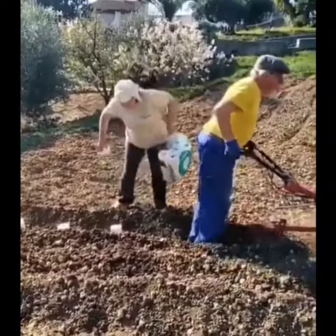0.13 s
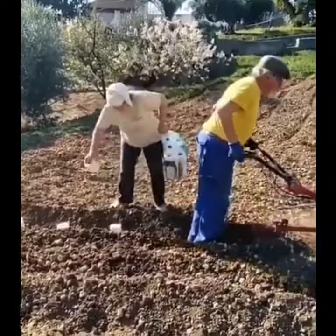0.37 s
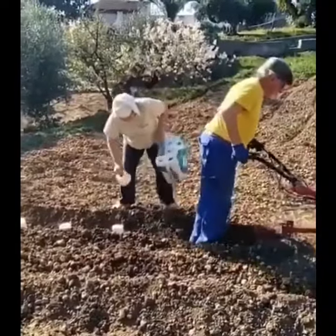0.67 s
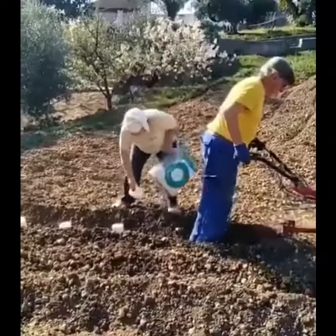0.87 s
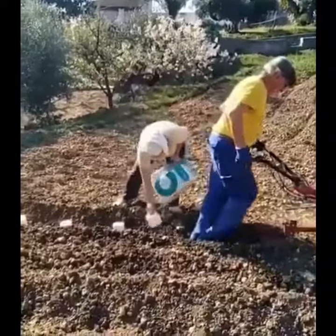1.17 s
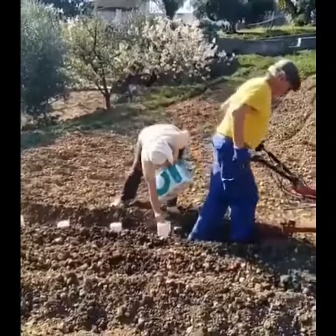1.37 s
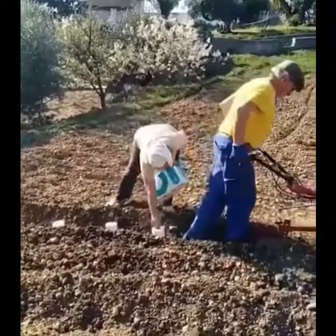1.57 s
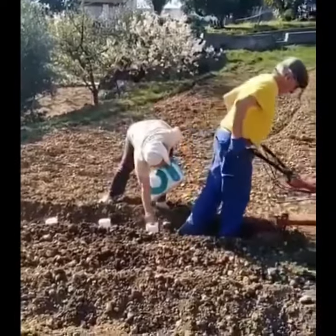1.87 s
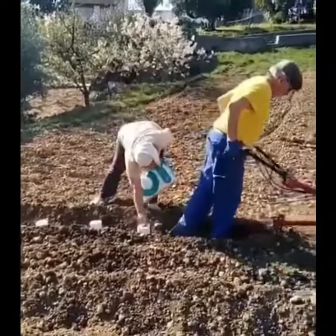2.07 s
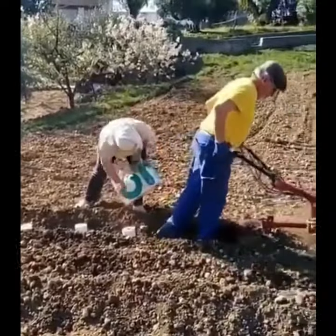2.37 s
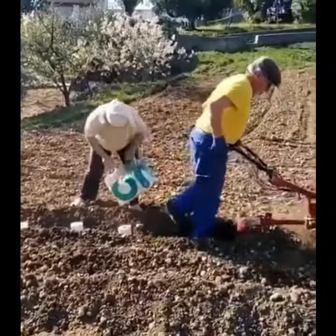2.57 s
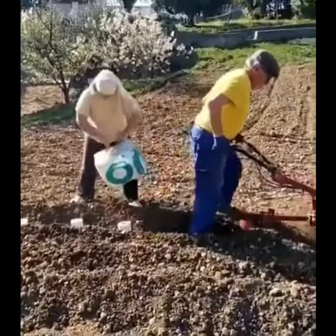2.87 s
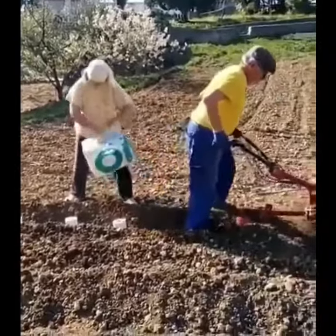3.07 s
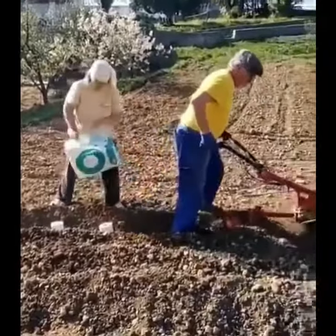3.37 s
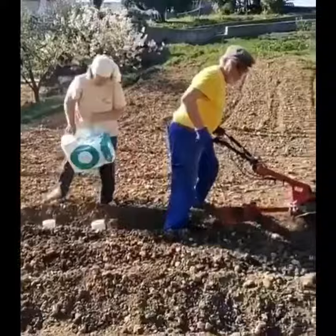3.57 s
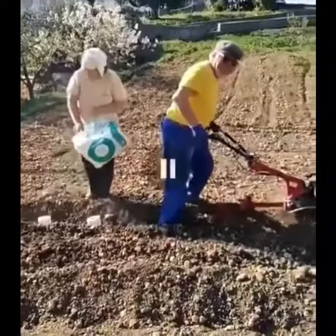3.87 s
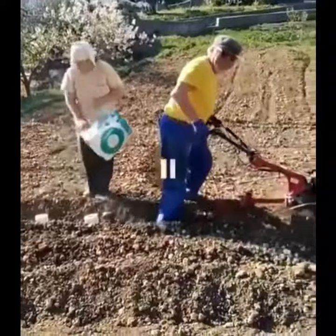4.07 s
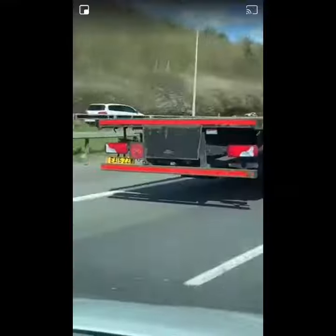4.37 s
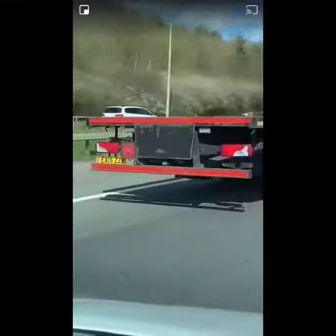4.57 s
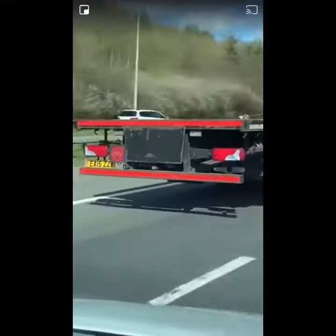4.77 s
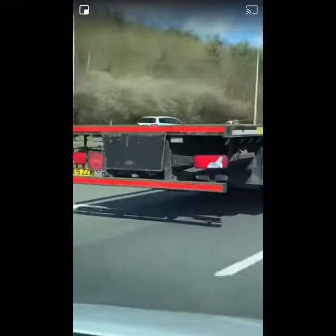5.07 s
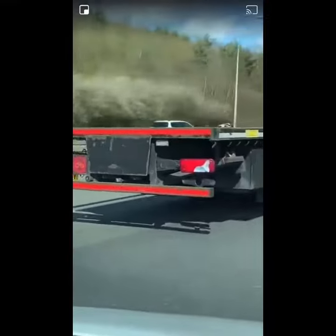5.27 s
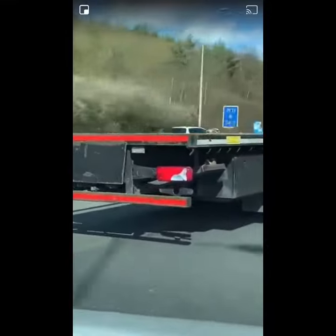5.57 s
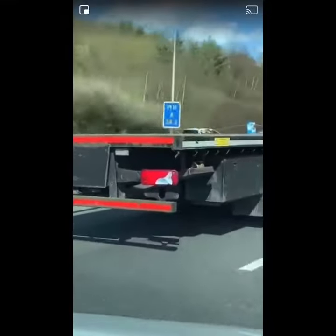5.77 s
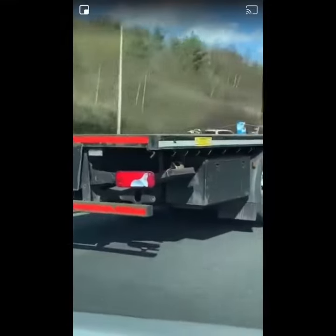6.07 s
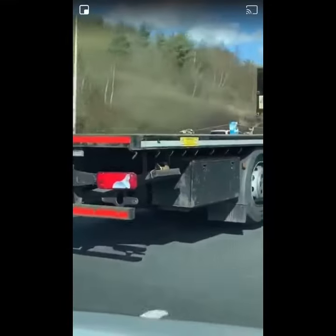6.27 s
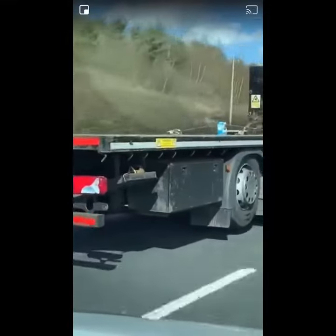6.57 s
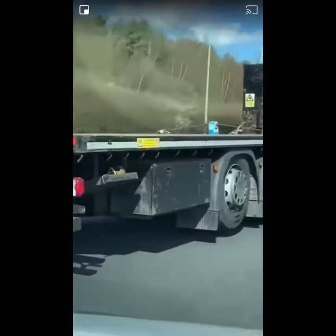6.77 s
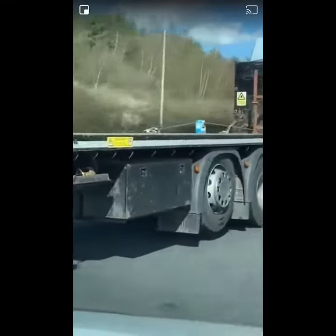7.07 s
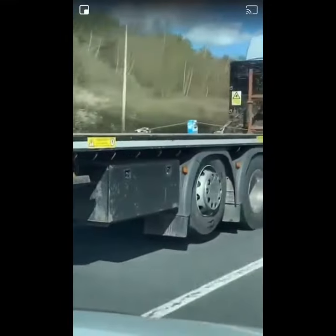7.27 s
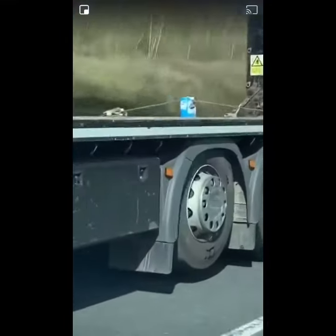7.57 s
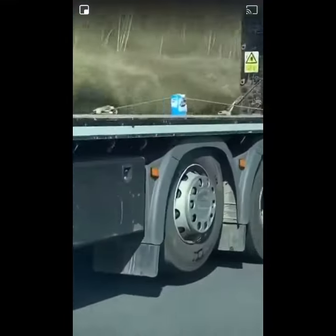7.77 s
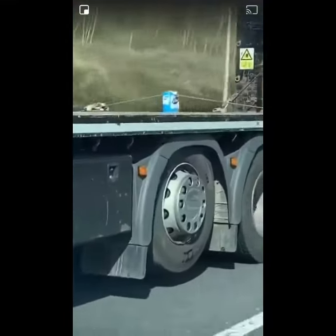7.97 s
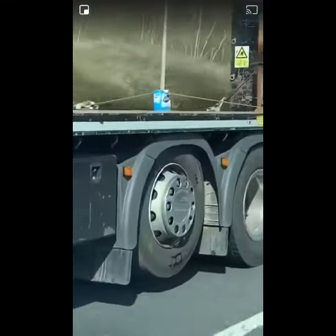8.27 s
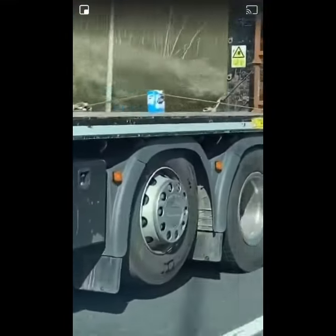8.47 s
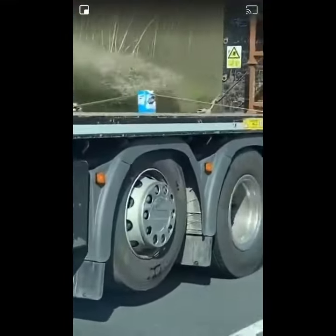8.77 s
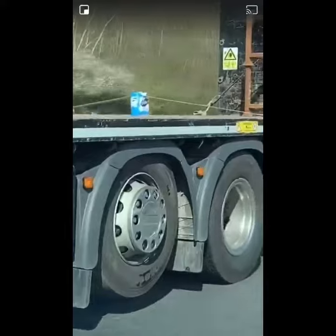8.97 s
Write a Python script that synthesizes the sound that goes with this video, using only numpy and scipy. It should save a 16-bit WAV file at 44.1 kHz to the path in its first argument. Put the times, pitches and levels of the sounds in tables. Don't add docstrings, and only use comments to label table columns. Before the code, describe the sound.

A small petrol tiller chugs and rattles through gravelly soil outdoors, stops dead, then a deep booming car cabin rumble at motorway speed takes over.

```python
import sys
import numpy as np
from scipy import signal
from scipy.fft import rfft, irfft, dct, next_fast_len
from scipy.io import wavfile
from scipy.ndimage import uniform_filter1d, map_coordinates

SR = 44100
rng = np.random.default_rng(int(sys.argv[2]) if len(sys.argv) > 2 else 0)


def invert_db(x):
    u = np.asarray(x, float) / 20
    return 10 ** u


def bounce(signal):
    frames = np.transpose(np.atleast_2d(signal))
    limited = np.clip(frames, -1, 1)
    pcm = np.round(limited * 32767).astype(np.int16)
    wavfile.write(sys.argv[1], SR, pcm)


N = 402633

# [t/s, firing rate/Hz]
FIRING_RATE = [(0.0, 32.07), (0.244, 33.61), (0.577, 32.09), (0.706, 33.47), (0.839, 32.87), (1.4, 33.17),
               (1.477, 34.46), (1.529, 32.83), (2.066, 33.04), (2.33, 34.23), (2.544, 31.71),
               (2.691, 34.08), (2.986, 32.26), (3.303, 32.78), (3.406, 34.01), (3.568, 31.82),
               (3.672, 33.19), (4.3, 32.73)]
# [t/s, level/dB]
TINE_LOAD = [
    (0, 0.5),
    (.4, 0),
    (1.0, 0),
    (2.0, 0.5),
    (2.45, 0),
    (3.15, 0.5),
    (3.5, -0.5),
    (3.9, 1),
    (4.3, 0),
]
# [multiple of firing rate, level/dB]
EXHAUST_ORDERS = [(1, -23.5), (2, -4.5), (3, -1), (4, -12.5), (5, -2), (6, 1.5), (7, -4), (8, -4), (9, -4),
                  (10, 3), (11, -3.5), (12, -12.5), (13, -29), (14, -29.5), (15, -20.5), (16, -23.5),
                  (17, -16.5), (18, -26.5), (19, -43.5), (20, -10), (21, -36)]
# [f/Hz, level/dB]
CASING_SPECTRUM = [(400, -42.5), (700, -18.5), (1600, -1.5), (2800, -3), (4000, -9.5), (5300, -6.5),
                   (6400, 3), (7400, 0.5), (9000, -9), (10300, -9), (10900, -46.5)]
# [f/Hz, level/dB]
VALVE_SPECTRUM = [(1200, -20), (2500, -1.5), (8000, -4.5), (10500, -21)]
# [f/Hz, level/dB]
ANSWER_SPECTRUM = [(500, -22), (800, 5), (2000, -2.5), (3500, -35)]
# [f/Hz, level/dB per Hz]
CHURN_SPECTRUM = [(240, -8), (400, -6), (491, -14), (572, -8.5), (665, -1.5), (937, -5), (1580, -2),
                  (2220, -5), (2770, -3), (3960, -14.5), (5280, -7.5), (6320, -2.5), (7240, -2.5),
                  (9800, -8), (10600, -51), (13800, -54), (22000, -120)]
# [t/s, peak level/dB, f/Hz]
STONES = [
    (3.157, -6, 1110),
    (3.179, -6, 991),
]
# [t/s, peak level/dB]
HIGH_FLICKERS = [(0.0488, -30), (0.155, -44), (0.1755, -42), (0.2912, -41.5), (0.5033, -49.5), (0.5663, -43.5),
                 (0.7387, -47.5), (0.7771, -24.5), (0.9902, -30), (1.0819, -37.5), (1.204, -39),
                 (1.2331, -43.5), (1.6546, -51), (1.6857, -44.5), (1.8362, -27.5), (2.0473, -42.5),
                 (2.592, -49), (2.6236, -41), (2.7978, -47), (3.1075, -40.5), (3.1592, -47), (3.2291, -35.5),
                 (3.2899, -29), (3.715, -41), (3.8862, -40.5), (3.926, -45), (3.9599, -41.5), (3.9873, -29.5),
                 (4.141, -41.5), (4.2964, -35)]
# [f/Hz, level/dB]
FLICKER_SPECTRUM = [(11600, -28), (12800, -6), (14000, 0), (15500, -4), (15900, -30)]
# [f/Hz, level/dB]
SKIRT_SPECTRUM = [(10000, 0), (10600, -8), (11600, -26)]
# [t/s, peak level/dB, half length/s]
WIND_GUSTS = [
    (.1, -29.5, .1),
    (.67, -27, 0.071),
    (.86, -22, 0.083),
    (1.2, -22.5, 0.072),
    (1.5, -20, .07),
    (1.93, -24.5, 0.073),
    (3.15, -31.5, 0.11),
    (3.7, -32.5, 0.078),
]
# [f/Hz, level/dB per Hz]
WIND_SPECTRUM = [(30, -33), (60, -7), (150, 2), (300, -5.5), (450, -17), (700, -35)]
# [f/Hz, width/Hz]
DRIFTING_NULLS = [(3600, 200), (4100, 330), (8800, 150), (9200, 200)]
# [t/s, firing order f/Hz, effort level/dB]
CAR_ENGINE = [(4.46, 85.5, -24.5), (4.62, 85.5, -16.5), (5.0, 85.5, -23), (5.1, 85.5, -18.5),
              (5.22, 85.5, -24.5), (5.45, 85.5, -17.5), (6.3, 85.5, -21.5), (6.45, 85.4, -27),
              (6.65, 85.4, -19.5), (7.11, 85.4, -21), (7.4, 84.1, -21.5), (7.75, 84.2, -22.5),
              (7.95, 82.8, -20.5), (8.25, 80.1, -27.5), (8.5, 82.8, -17.5), (8.62, 82.8, -30),
              (8.75, 83, -25), (9.13, 80.1, -23.5)]
# [f/Hz, width/Hz, level/dB]
AIR_MODE = [(50.3, 36, 0)]
# [t/s, boom level/dB, half length/s]
ROAD_BUMPS = [(4.51, -22, .05), (4.88, -17.5, 0.056), (5.05, -17.5, .06), (5.32, -16, .05),
              (5.44, -15, .04), (5.66, -13.5, .05), (5.98, -17.5, .04), (6.09, -18, 0.048),
              (6.38, -17.5, .04), (6.5, -17.5, 0.049), (6.7, -20, 0.1), (6.97, -17.5, .06),
              (7.14, -18.5, 0.078), (7.28, -17, .03), (7.56, -19.5, .07), (7.78, -17.5, .05),
              (7.97, -18.5, 0.16), (8.2, -18, .04), (8.33, -18, 0.033), (8.51, -22, .06),
              (8.75, -14, 0.071), (8.98, -19, 0.033)]
# [f/Hz, width/Hz, level/dB]
PANEL_MODES = [(110.8, 22, 0), (165, 26.4, 0), (196.7, 54.5, -7.5), (261, 26, -6.5), (294, 30.5, -4),
               (347.3, 17, -5.5), (375, 33, -9)]
# [f/Hz, level/dB per Hz]
ROAR_SPECTRUM = [(250, -24), (420, -2.5), (591, -6.5), (820, -5), (1240, -10.5), (1340, -15.5),
                 (1470, -13.5), (3830, -38.5), (4290, -39.5), (4810, -74), (5390, -53.5), (6760, -50),
                 (8600, -62.5), (11200, -84.5), (18900, -120)]
# [f/Hz, level/dB per Hz]
PORT_DIFFERENCE = [(88, -31), (150, -9.5), (213, -1), (262, -1), (341, 1.5), (527, -5), (787, -3.5),
                   (1200, -6.5), (1420, -7.5), (2090, -22.5), (5090, -32), (5950, -39), (6610, -68.5),
                   (8580, -38), (9700, -47.5), (12600, -83), (21300, -120)]
# [t/s, peak level/dB]
RELAY_TICKS = [
    (4.4902, -45),
    (4.8898, -39),
    (4.9916, -47.5),
    (5.2859, -46),
    (5.6885, -40.5),
]
# [f/Hz, width/Hz, level/dB]
RELAY_MODES = [(4130, 200, -5), (5900, 470, -6.5), (6840, 370, -9), (7820, 250, -9)]
# [t/s, peak level/dB]
TRIM_CLICKS = [
    (7.424, -45),
    (7.6804, -56),
    (7.691, -47),
]
# [f/Hz, level/dB]
TRIM_SPECTRUM = [(1500, -8), (3000, -2), (7000, -3), (10000, -13), (11000, -60)]
# [f/Hz, level/dB]
COMMON_TREBLE = [(20, -1), (4100, 1.5), (4400, -13.5), (5000, -2.5), (5400, 10), (8000, 8), (8500, -8.5),
                 (9800, -32)]
# [f/Hz, level/dB]
PORT_LEAN = [(60, -1.3), (300, -2.5), (600, -2.5), (1500, 0)]
# [f/Hz, phase/rad]
PORT_LEAD = [(250, 0), (800, .4), (1500, .5), (3500, .6), (4500, 0)]

FIRST_CYCLE = .37
ECHO_CYCLES, ECHO_GAIN = .335, .6
EXHAUST_DB, CHURN_DB, CLATTER_DB = -23, -18.2, -19.5
EXHAUST_GROWS, CHURN_GROWS = 0.23, 0.87
SHUDDER_DB = 0.23
BREEZE_DB = -33.5
FIELD_TOP_HZ, SKIRT_DB = 10200, -62
CEILING = .72
SMOOTH_ROAD_DB = -26
ROAD_DB, ROAR_MEAN_DB = -18.5, -37.5
ROAD_SWAY_DB, HUM_SWAY_DB = 1, 0.5
ROAR_COMMON_DB, ROAR_APART_DB = 7.5, 7
CUT_S, FADE_START_S, FADE_END_S = 4.2988, 4.392, 4.485


def unit(x):
    return x / np.sqrt(np.mean(x ** 2) + 1e-20)


def shape(points):
    f, db = np.transpose(points)
    return lambda hz: invert_db(np.interp(np.log(hz + 1), np.log(f + 1), db, -120, -120))


def modes(rows):
    def response(f):
        total = 0
        for k, (centre, width, db) in enumerate(rows):
            damping = 1j * f * width
            total = total + (-1) ** k * invert_db(db) * damping / (centre * centre - f * f + damping)
        return total
    return response


def curves(rows):
    s, *cols = np.transpose(rows)
    t = np.arange(N) / SR
    return [uniform_filter1d(np.interp(t, s, c), size=1500) for c in cols]


def wobble(rate_hz):
    knots = rng.standard_normal(int(N * rate_hz / SR) + 4)
    return map_coordinates(knots, [np.arange(N) * rate_hz / SR])


def swells(events, floor_db):
    t = np.arange(0, N, 64) / SR
    power = invert_db(2 * floor_db)
    for s, db, half_s in events:
        power = power + invert_db(2 * db) * np.exp(-((t - s) / half_s) ** 2)
    return np.interp(np.arange(N) / SR, t, 10 * np.log10(power))


def puffs(events, life_s, rise_s):
    env, t = np.zeros(N + SR), np.arange(SR // 4) / SR
    for s, db in events:
        env[round(s * SR):][:len(t)] += invert_db(db - 60 * t / life_s) * (1 - np.exp(-t / rise_s))
    return env[:N]


def filtered(x, response):
    m = next_fast_len(N + 8192)
    return irfft(rfft(x, m) * response(np.fft.rfftfreq(m, 1 / SR)), m)[..., :N]


def rush(response, patchy_db, size=512):
    z = signal.stft(rng.standard_normal(N), nperseg=size)[2]
    field = uniform_filter1d(rng.standard_normal(z.shape), size=3, axis=0)
    field = uniform_filter1d(field, size=5, axis=1)
    noise = signal.istft(z * invert_db(patchy_db * unit(field)), nperseg=size)[1][:N]
    return unit(filtered(noise, response))


def soft_ceiling(x):
    return x / (1 + np.abs(x / CEILING) ** 6) ** (1 / 6)


def thinned(x, under_db, quiet_db):
    m, band = 1024, 8
    h = m // 2
    window = np.sin(np.pi * (np.arange(2 * m) + .5) / (2 * m))
    padded = np.pad(x, (m, 2 * m))
    frames = np.lib.stride_tricks.sliding_window_view(padded, 2 * m)[::m] * window
    a, b, c, d = np.split(frames, 4, axis=1)
    coef = dct(np.hstack([-c[:, ::-1] - d, a - b[:, ::-1]]), type=4, norm="ortho")
    level_db = 10 * np.log10(np.mean(coef.reshape(len(coef), -1, band) ** 2, axis=2) + 1e-14)
    step_db = np.maximum(uniform_filter1d(level_db, size=17, axis=1) - under_db, quiet_db)
    step_db[:, :14] -= np.linspace(5, 1, 14) ** 2
    step = np.repeat(invert_db(step_db), band, axis=1)
    alive = np.repeat(level_db > step_db - 11, band, axis=1)
    rounded = np.sign(coef) * np.floor(np.abs(coef) / step + .36) * step * alive
    u = dct(rounded, type=4, norm="ortho")
    p, q = u[:, :h], u[:, h:]
    out = np.hstack([q, -q[:, ::-1], -p[:, ::-1], -p]) * window
    return (out[1:, :m] + out[:-1, m:]).ravel()[:N]


def exhaust(cycle):
    beat = np.zeros(N)
    for k, db in EXHAUST_ORDERS:
        echo_phase = np.angle(1 + ECHO_GAIN * np.exp(-2j * np.pi * k * ECHO_CYCLES))
        phase = 2 * np.pi * k * cycle + echo_phase + 0.18 * wobble(13)
        beat -= invert_db(db + 0.9 * wobble(12)) * np.cos(phase)
    return unit(beat)


def casing_burst(firing, since_s):
    strengths = invert_db(np.minimum(2.5 * rng.standard_normal(400), 3))
    size = strengths[firing.astype(int)]
    blow = size * since_s / 0.002 * np.exp(1 - since_s / 0.0024)
    snap = np.maximum(since_s - .0015, 0) / .0004
    crack = .3 * np.minimum(size, 1.6) ** 2 * snap * np.exp(1 - snap)
    rattle = blow * rush(shape(CASING_SPECTRUM), patchy_db=3)
    return rattle + crack * rush(shape(VALVE_SPECTRUM), patchy_db=-0.5)


def pipe_answer(since_s):
    late = np.maximum(since_s - .0105, 0) / 0.00088
    return late * np.exp(1 - late) * rush(shape(ANSWER_SPECTRUM), patchy_db=0.5)


def churned_soil(churn_db, clatter_db):
    hiss = rush(shape(CHURN_SPECTRUM), patchy_db=2.7, size=2048)
    high = filtered(hiss, lambda hz: 1 / (1 + (4000 / (hz + 1)) ** 8))

    def notch(hz):
        upper = .4 * np.exp(-((hz - 9150) / 250) ** 2)
        return 1 - upper - .2 * np.exp(-((hz - 3900) / 200) ** 2)
    soil = invert_db(churn_db - 0.3) * unit(hiss - high)
    return soil + invert_db(clatter_db - 2.5) * unit(filtered(high, notch))


def stones():
    total = np.zeros(N)
    for s, db, hz in STONES:
        ring = rush(modes([(hz, 200, 0), (1.9 * hz, 300, -3)]), patchy_db=0)
        total += puffs([(s, db - 7)], .25, rise_s=.004) * ring
    return total


def wind():
    wind_db = swells(WIND_GUSTS, BREEZE_DB) + 1.5 * wobble(25)
    return invert_db(wind_db) * rush(shape(WIND_SPECTRUM), patchy_db=2)


def tiller():
    load_db = curves(TINE_LOAD)[0]
    exhaust_db = EXHAUST_DB + EXHAUST_GROWS * load_db
    churn_db = CHURN_DB + CHURN_GROWS * load_db + SHUDDER_DB * wobble(6)
    clatter_db = CLATTER_DB + load_db + SHUDDER_DB * wobble(6)
    rate = curves(FIRING_RATE)[0]
    cycle = FIRST_CYCLE + np.cumsum(rate) / SR
    firing = cycle + .06
    since_s = firing % 1 / rate
    engine = invert_db(exhaust_db + 1.85) * exhaust(cycle)
    engine += invert_db(clatter_db + 6.5) * casing_burst(firing, since_s)
    engine += invert_db(churn_db + 1) * pipe_answer(since_s)
    return engine + churned_soil(churn_db, clatter_db) + stones() + wind()


def high_flicker():
    flickers = puffs(HIGH_FLICKERS, .035, rise_s=.0015) * invert_db(-4) * rush(shape(FLICKER_SPECTRUM), patchy_db=6)
    skirt = invert_db(SKIRT_DB + 6 * wobble(25)) * rush(shape(SKIRT_SPECTRUM), patchy_db=3)
    return flickers + thinned(skirt, under_db=6, quiet_db=-47)


def field():
    direct = tiller()
    x = direct
    for hz, width in DRIFTING_NULLS:
        depth = np.clip(.05 + .32 * wobble(22), 0, .7)
        x = x - depth * filtered(direct, lambda f: np.exp(-((f - hz) / width) ** 2))
    x = filtered(soft_ceiling(x), lambda hz: 1 / (1 + (hz / FIELD_TOP_HZ) ** 90))
    return thinned(x, under_db=-3, quiet_db=-36) + high_flicker()


def air_boom():
    sway = np.sqrt(2) * np.sin(2 * np.pi * np.cumsum(50.5 + 3 * wobble(8)) / SR)
    noise = unit(filtered(rush(modes(AIR_MODE), patchy_db=4), modes([(51.3, 95, 0)])))
    return invert_db(swells(ROAD_BUMPS, SMOOTH_ROAD_DB)) * (0.88 * sway + .5 * noise)


def engine_hum():
    order_hz, engine_db = curves(CAR_ENGINE)
    engine_db = engine_db + HUM_SWAY_DB * wobble(9)
    hum = np.sqrt(2) * np.sin(2 * np.pi * np.cumsum(order_hz) / SR + 0.19 * wobble(18))
    near_hum = rush(modes([(84.5, 18, 0)]), patchy_db=1.3)
    return invert_db(engine_db + 4) * (0.72 * hum + 0.53 * near_hum)


def panel_rumble():
    def band(hz):
        return 1 / (1 + (hz / 430) ** 6) / (1 + (85 / (hz + 1)) ** 6)
    rumble = unit(filtered(rush(modes(PANEL_MODES), patchy_db=0.1), band))
    return invert_db(ROAD_DB + ROAD_SWAY_DB * wobble(9)) * rumble


def relay_and_trim():
    relay = unit(filtered(rush(modes(RELAY_MODES), patchy_db=4), modes(RELAY_MODES)))
    ticks = puffs(RELAY_TICKS, 0.065, rise_s=0.0026) * relay
    trim = rush(shape(TRIM_SPECTRUM), patchy_db=-1)
    return ticks + puffs(TRIM_CLICKS, .012, rise_s=0.00019) * invert_db(5) * trim


def port_response(hz):
    f, db = np.transpose(PORT_LEAN)
    lean_db = np.interp(np.log(hz + 1), np.log(f), db)
    lead_rad = np.interp(hz, *np.transpose(PORT_LEAD))
    return invert_db(np.outer([.5, -.5], lean_db)) * np.exp(np.outer([.5j, -.5j], lead_rad))


def cabin():
    roar_db = ROAR_MEAN_DB + 0.27 * wobble(4)
    roar_db = roar_db + 0.25 * wobble(7.6) + 0.7 * wobble(30)
    roar = invert_db(roar_db + ROAR_COMMON_DB) * rush(shape(ROAR_SPECTRUM), patchy_db=2.7, size=2048)
    side = invert_db(roar_db + ROAR_APART_DB) * rush(shape(PORT_DIFFERENCE), patchy_db=3.2, size=2048)
    ticks = relay_and_trim()
    low = soft_ceiling(air_boom() + engine_hum() + panel_rumble())
    low = filtered(low, lambda hz: 1 / (1 + (hz / 900) ** 6))
    mid = filtered(low + roar, shape(COMMON_TREBLE)) + ticks
    mid = thinned(mid, under_db=-3, quiet_db=-51)
    side = thinned(side + .6 * ticks, under_db=-3, quiet_db=-51)
    return filtered(np.array([mid, mid]), port_response) + np.outer([1, -1], side)


def scene():
    t = np.arange(N) / SR
    stop = np.clip((CUT_S - t) / .001, 0, 1)
    fade = np.clip((t - FADE_START_S) / (FADE_END_S - FADE_START_S), 0, 1)
    return stop * field() + fade * cabin()


def top_cut(x):
    return signal.sosfilt(signal.butter(12, 15830, fs=SR, output="sos"), x)


def record(dry):
    return top_cut(dry)


dry = scene()
out = record(dry)
bounce(out)
```